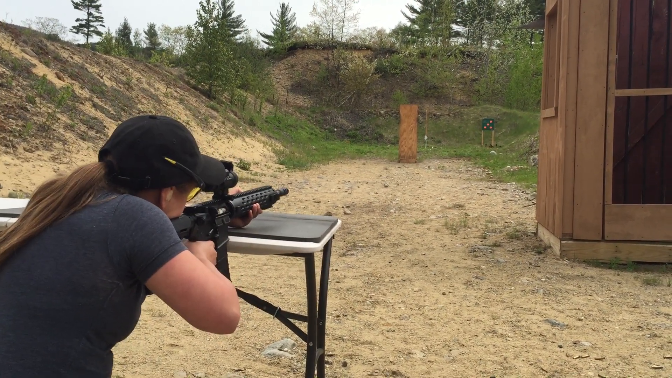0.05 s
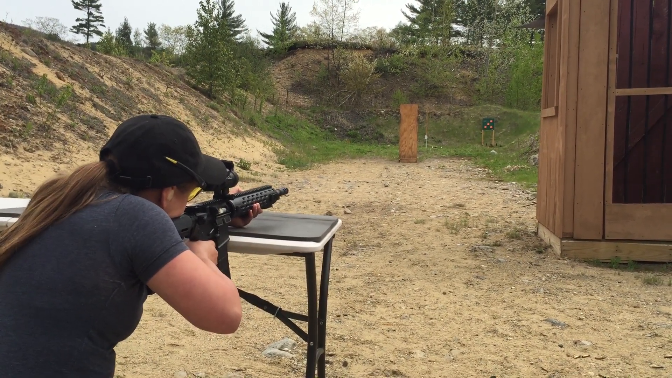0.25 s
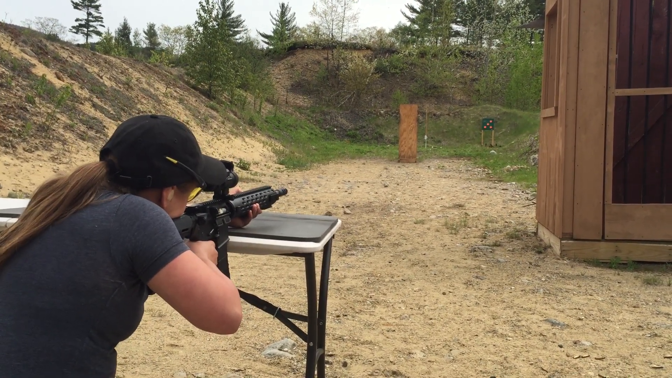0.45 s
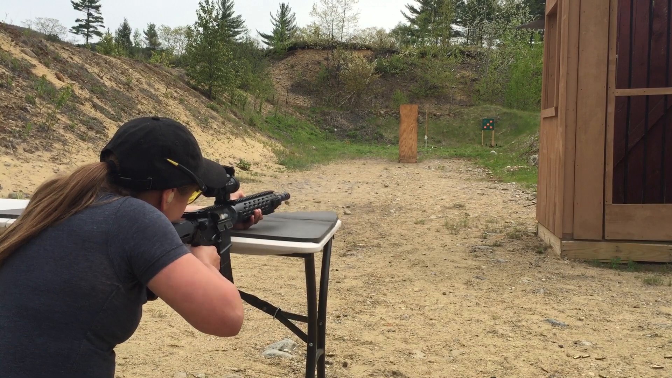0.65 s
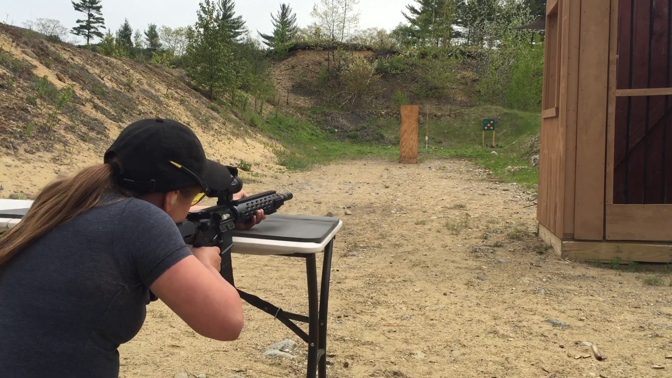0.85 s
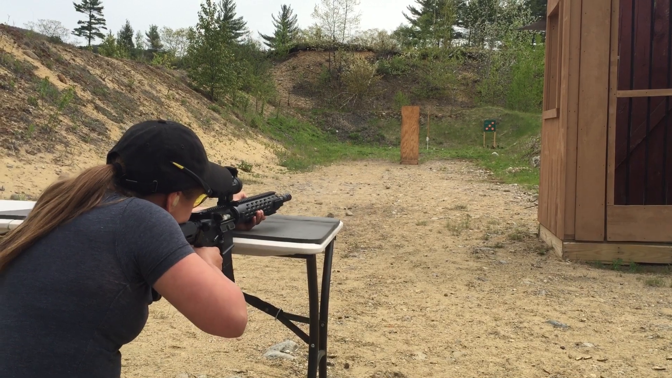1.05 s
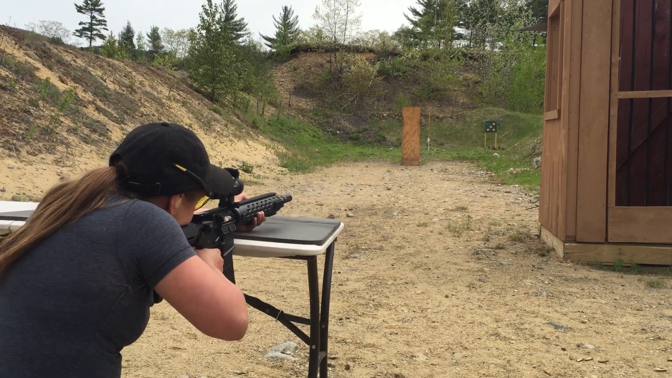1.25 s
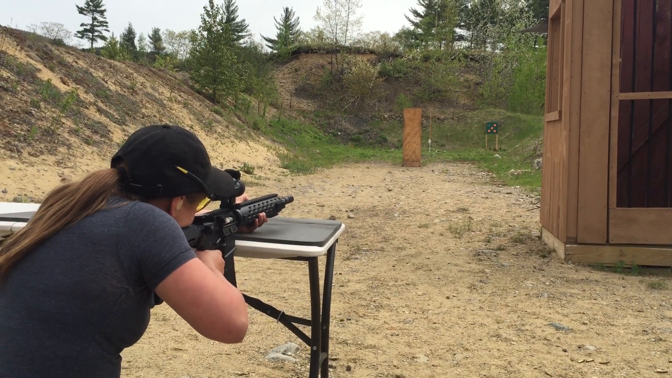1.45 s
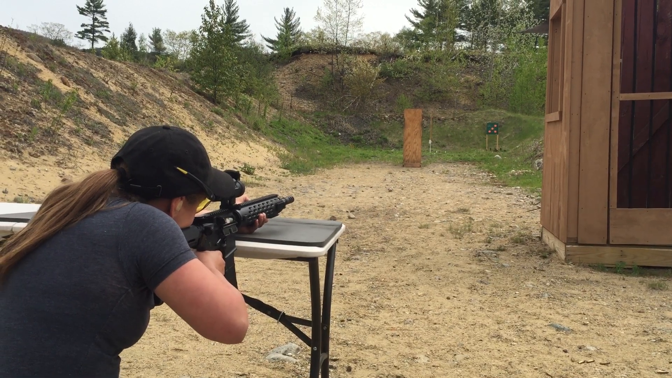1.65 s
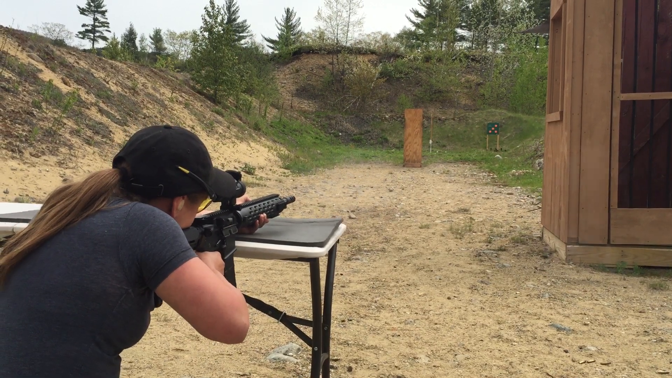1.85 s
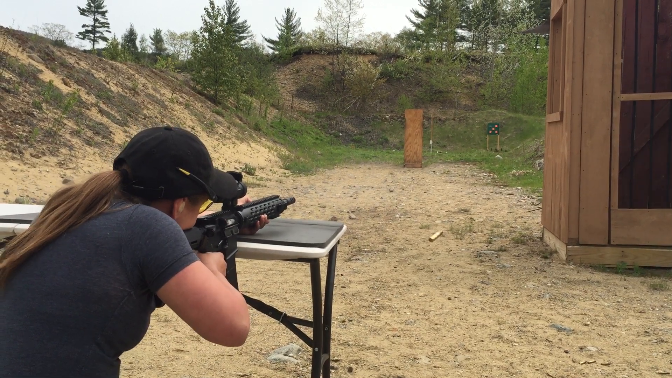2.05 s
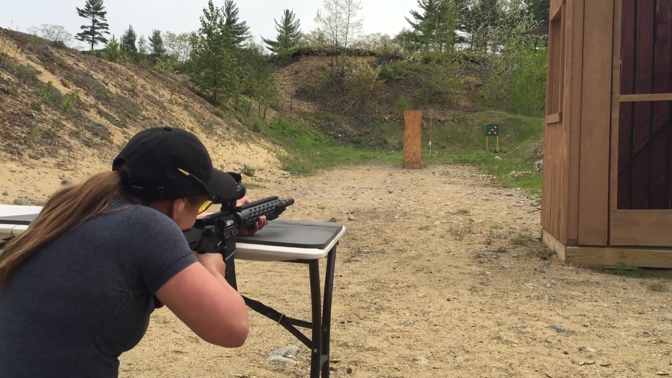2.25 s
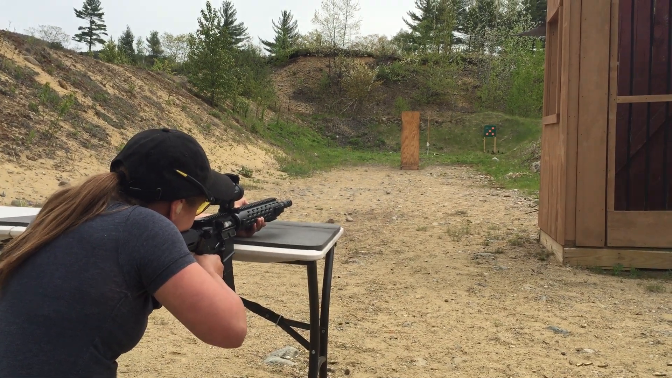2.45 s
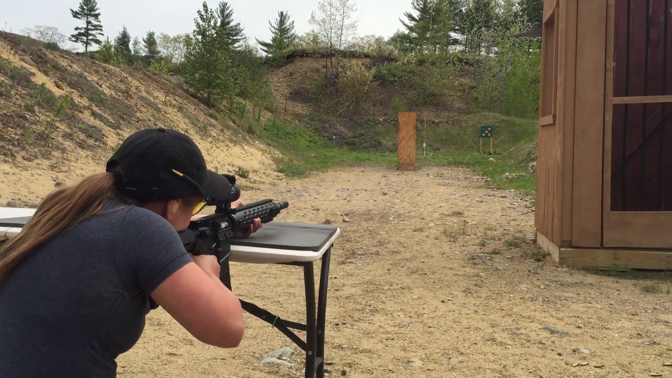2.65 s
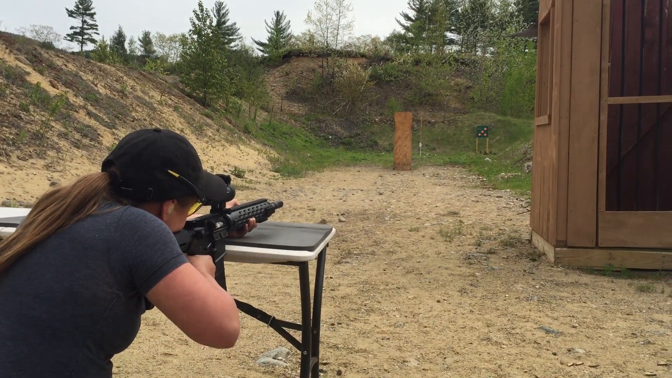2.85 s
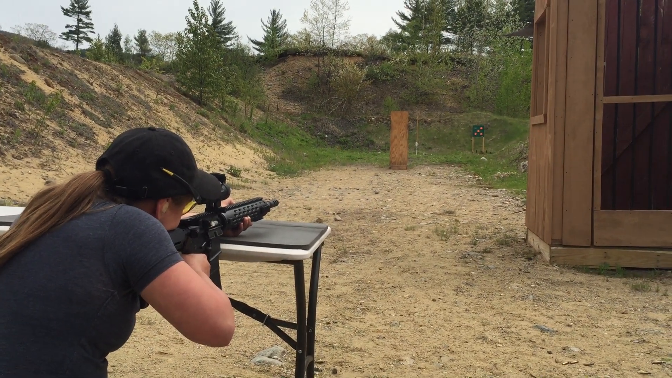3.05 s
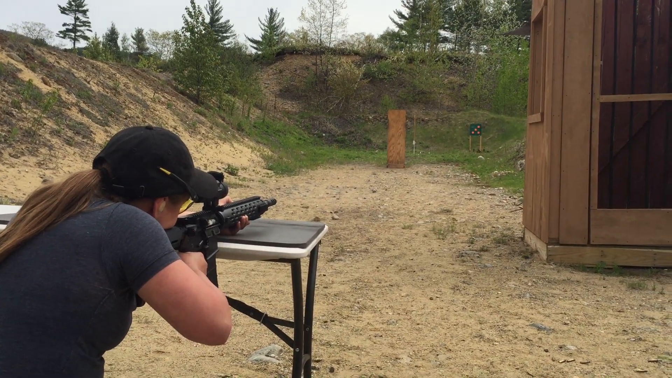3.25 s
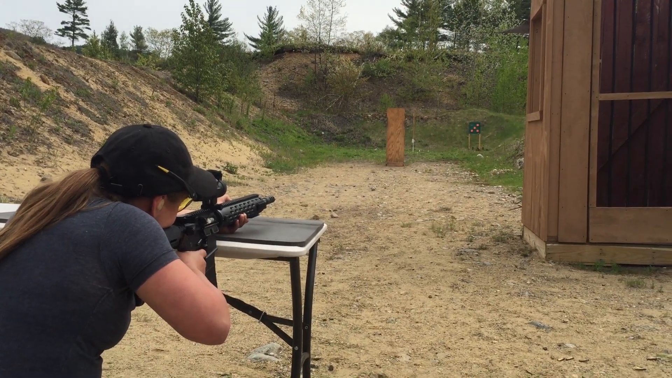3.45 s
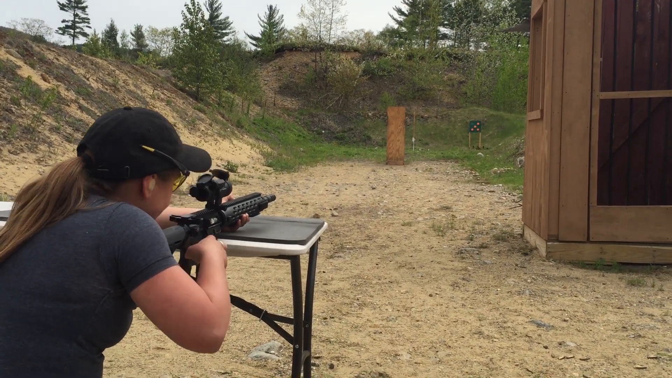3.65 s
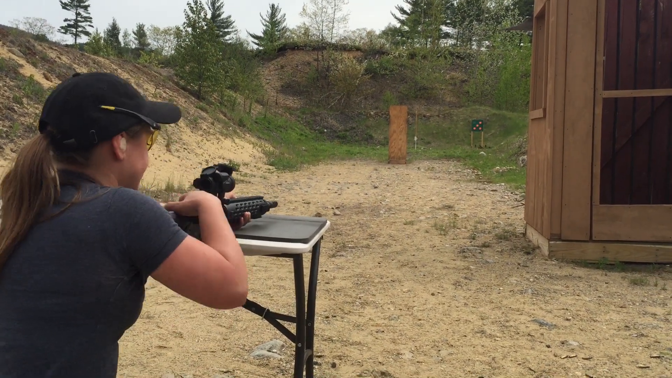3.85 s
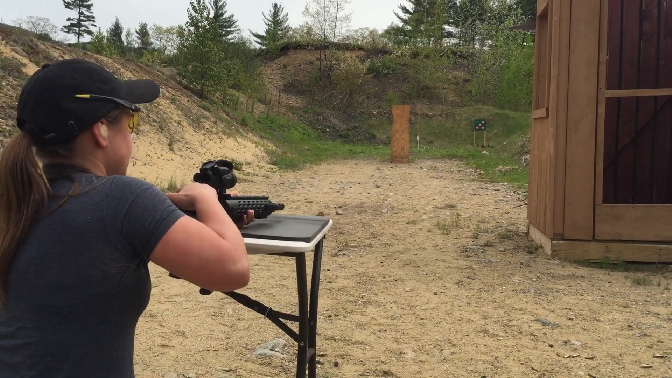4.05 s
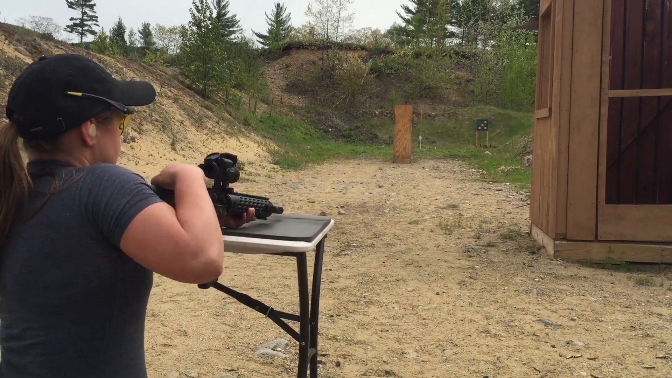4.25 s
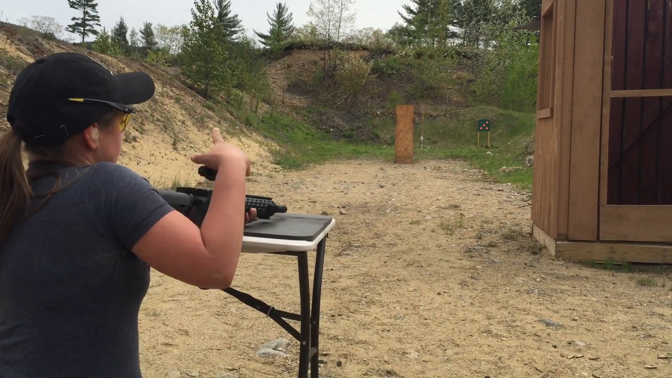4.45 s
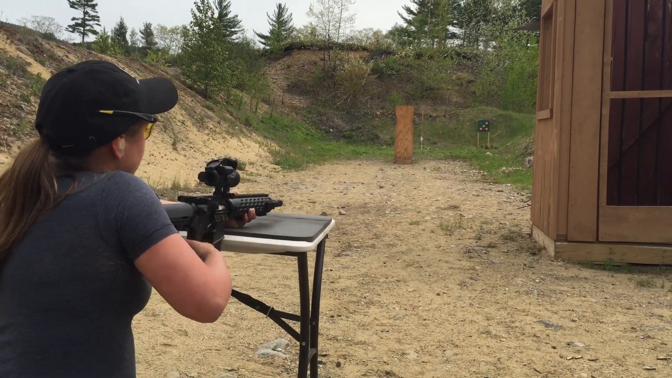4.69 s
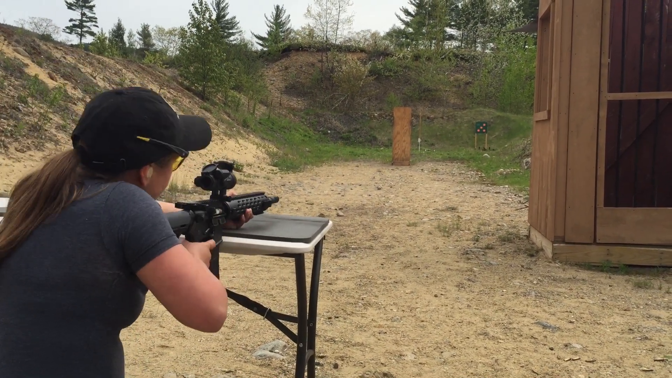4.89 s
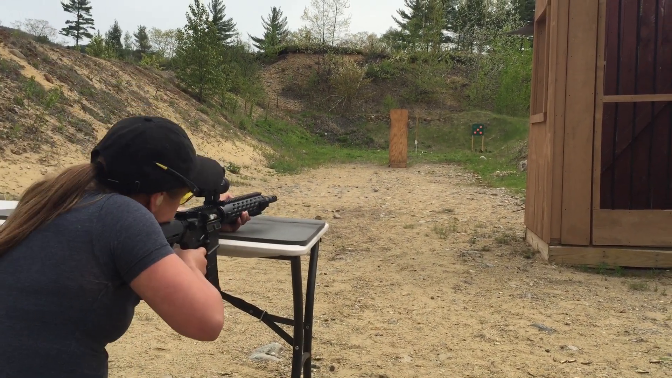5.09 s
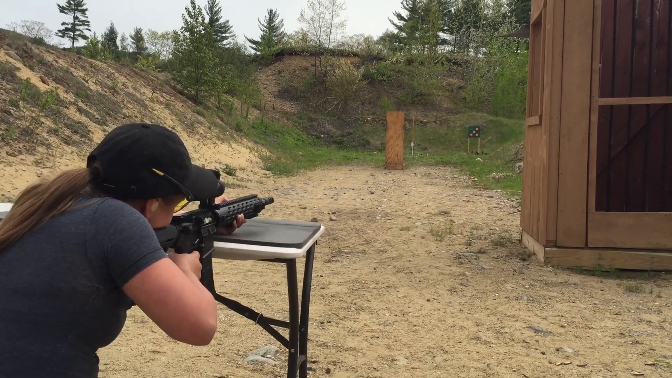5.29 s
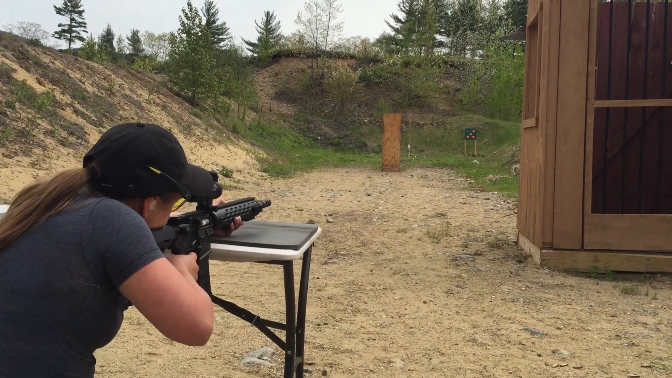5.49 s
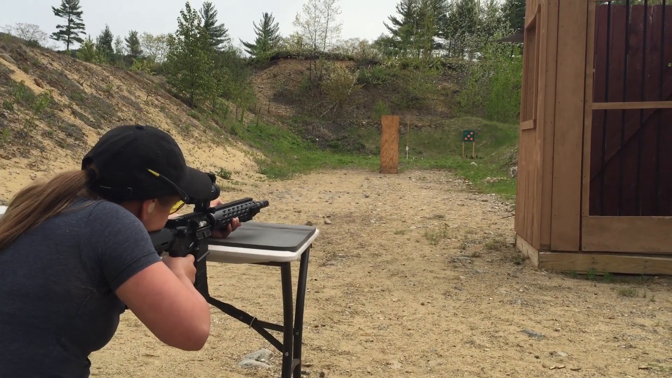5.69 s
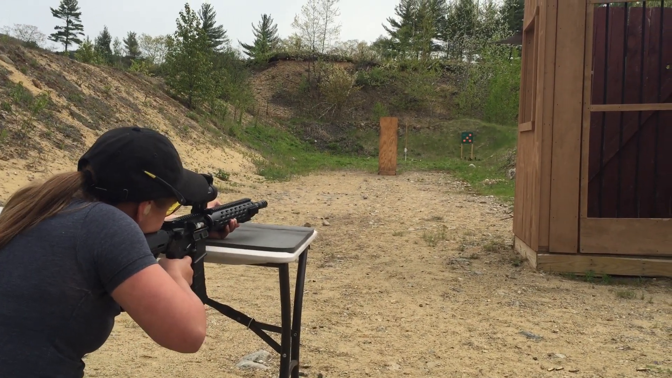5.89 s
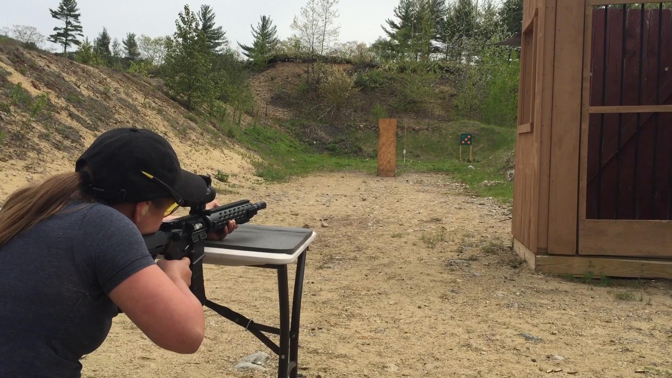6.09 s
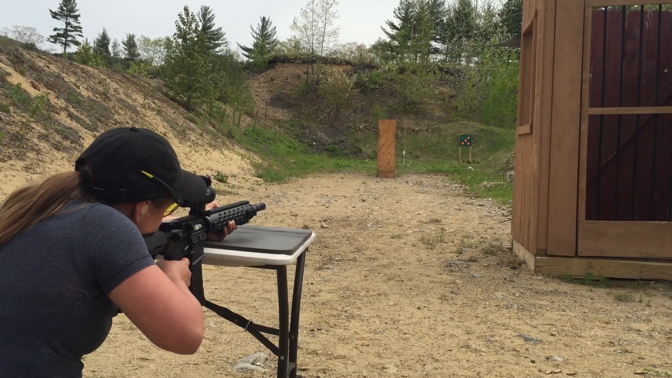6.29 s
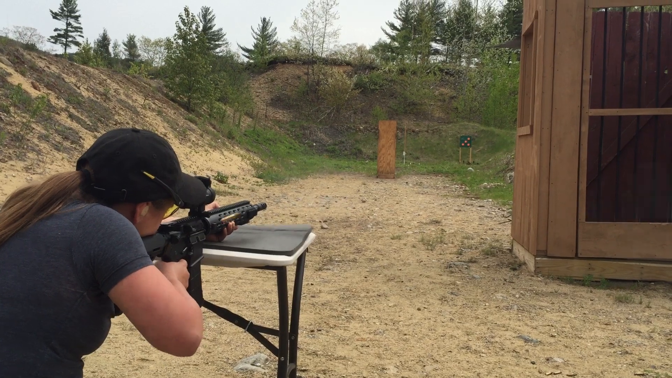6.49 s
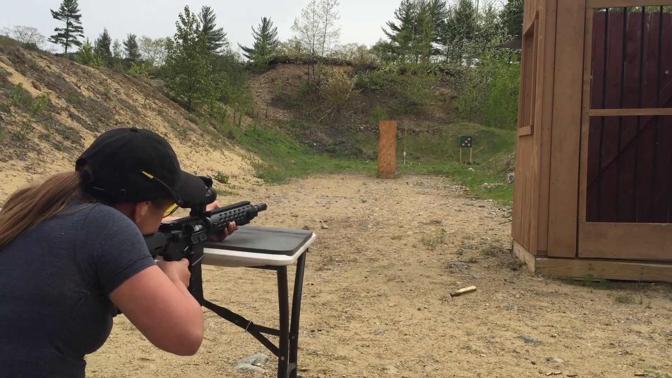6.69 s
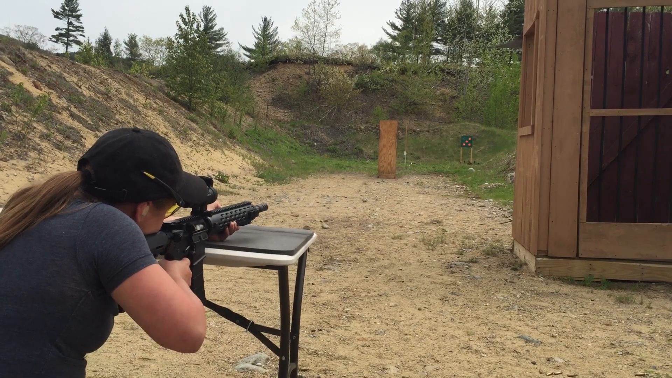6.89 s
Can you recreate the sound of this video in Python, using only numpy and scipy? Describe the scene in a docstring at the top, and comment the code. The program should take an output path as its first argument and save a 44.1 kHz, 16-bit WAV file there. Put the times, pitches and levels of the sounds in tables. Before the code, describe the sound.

A fading gun echo and faint bird whistles open an outdoor range. A close rifle fires twice, distorting the microphone, its bolt clattering and brass ticking on gravel. A sharp gun farther off cracks, then a dry hammer click, hands rubbing and the bolt racked hard. Muffled and sharp distant shots alternate before one last loud close blast.

```python
"""An outdoor range over steady air noise and a faint bird. A sharp gun's echo dies away, then a near rifle
fires twice, its bolt clattering and its cases landing. The sharp gun answers, the rifle's hammer clicks on a dead
round, and hands shift and rack the bolt. A gun muffled by an earth bank, the sharp one and the muffled one fire
before the rifle's last shot. Reports are decaying noise bands and low swings of pressure, echoes are scattered
noise, metal is grit through resonances; the close blasts overload the microphone and pull its gain down."""
import sys
import numpy as np
from scipy import signal
from scipy.fft import rfft, irfft, next_fast_len
from scipy.io import wavfile
from scipy.ndimage import uniform_filter1d

SR = 44100
rng = np.random.default_rng(int(sys.argv[2]) if len(sys.argv) > 2 else 0)


def put_to_file(sound):
    """Save the sound as 16-bit audio at rate SR, in the file named by the first command-line argument."""
    columns = np.atleast_2d(sound).T  # one column per channel
    safe = np.clip(columns, -1, 1)
    whole_steps = np.round(safe * 32767)
    wavfile.write(sys.argv[1], SR, whole_steps.astype(np.int16))


N = 305613
TIME = np.arange(N) / SR
BRIEF = TIME[:SR // 2]  # half a second, the length of each short sound such as a report, contact or bird call

# the near rifle's shots: (time [s], blast level [dB], level of the low push just ahead [dB], echo level [dB],
# bolt's travel to the rear [s], action level [dB]), levels relative
RIFLE_SHOTS = [(0.725, 0, 7.5, 3, 0.086, -9), (1.9911, 5.5, -11.5, 8.5, 0.082, -0.5),
               (6.5984, 3.5, -5, 7, .088, -0.5)]
# resonances of the receiver: (centre [Hz], width [Hz], relative level [dB])
RECEIVER_MODES = [(1090, 330, -3), (1670, 298, 3), (3150, 300, -0.5), (3365, 130, 2), (3700, 480, -3)]
# high resonances of small steel parts: (centre [Hz], width [Hz], relative level [dB])
STEEL_MODES = [(4750, 1800, -8), (6094, 390, 8), (9500, 1000, -16), (13200, 4600, -21)]


def amp(db):
    """Decibels to a factor of amplitude."""
    return 10 ** (np.asarray(db) / 20)


def unit(x):
    """x scaled to rms 1."""
    return x / np.sqrt(np.mean(x ** 2) + 1e-20)


def along(points, hz):
    """Interpolate (frequency [Hz], value) points on a log axis."""
    f, values = np.transpose(points)
    return np.interp(np.log(hz + 1), np.log(f + 1), values)


def filtered(x, response):
    """x times a complex response of frequency."""
    size = next_fast_len(len(x) + 8192)
    spectrum = rfft(x, size) * response(np.fft.rfftfreq(size, 1 / SR))
    return irfft(spectrum, size)[:len(x)]


def noise(response, size):
    """Coloured noise of rms 1."""
    return unit(filtered(rng.standard_normal(size), response))


def grit(size, spiky_db):
    """Noise of rms 1 made of tiny uneven impacts."""
    knots = rng.standard_normal(size // 40 + 2)  # a new strength about every 40 samples
    places = np.linspace(0, len(knots) - 1, size)
    strength = amp(spiky_db * np.interp(places, np.arange(len(knots)), knots))
    return unit(strength * rng.standard_normal(size))


def fade(t60):
    """A decay of 60 dB in t60 seconds, never quicker than 2 ms."""
    return np.exp(-np.log(1000) * BRIEF / max(t60, .002))


def swell(rise):
    """A soft start that takes about rise seconds."""
    return 1 - np.exp(-(BRIEF / max(rise, 1e-5)) ** 2)


def add(track, s, sound):
    """Mix a sound in at time s; before zero, only its remainder is heard."""
    start = round(s * SR)
    part = sound[max(-start, 0):max(N - start, 0)]
    track[max(start, 0):][:len(part)] += part


def band_pass(f, centre, width):
    """Complex response of one resonance, 1 at its centre."""
    return 1j * f * width / (centre * centre - f * f + 1j * f * width)


def resonate(x, modes):
    """x through a body's resonances of alternating sign, keeping the power of white noise."""
    def response(f):
        body = sum((-1) ** k * amp(db) * band_pass(f, centre, width)
                   for k, (centre, width, db) in enumerate(modes))
        return body / np.sqrt(np.mean(abs(body) ** 2))
    return filtered(x, response)


def lifted(x, peaks):
    """x with a few ringing resonances added."""
    return filtered(x, lambda f: 1 + sum((amp(db) - 1) * band_pass(f, centre, width)
                                         for centre, width, db in peaks))


def burst(bands):
    """Sudden noise whose overlapping bands each die at their own speed."""
    centres = [hz for hz, _, _ in bands]
    edges = np.log([centres[0] / 2] + centres + [centres[-1] * 2])
    out = np.zeros(len(BRIEF))
    for k, (_, db, t60) in enumerate(bands):
        band = noise(lambda f: np.interp(np.log(f + 1), edges[k:k + 3], [0, 1, 0]), len(BRIEF))
        out += amp(db) * fade(t60) * band
    return out


def boom(modes):
    """Damped low swings of pressure that build within about a cycle, a little different every time."""
    out = np.zeros(len(BRIEF))
    for hz, db, t60 in modes:
        swing = np.sin(2 * np.pi * hz * rng.normal(1, 0.025) * BRIEF)
        out += amp(db) * swell(.8 / hz) * fade(t60) * swing
    return out


def report(bands, modes, slaps, peaks, rise, smear):
    """One muzzle report with its hard reflections, smeared by rough surfaces."""
    # noise of a hard reflection: (band centre [Hz], relative level [dB], t60 [s])
    slap_bands = [(400, -6, 0.05), (1450, -2.5, 0.086), (3300, 0, 0.029), (5660, -25, 0.095),
                  (12900, -33, 0.022)]
    crack = swell(rise) * burst(bands)
    for delay, db in slaps:
        reflection = np.pad(swell(smear) * burst(slap_bands), (round(delay * SR), 0))
        crack += amp(db - 9.5) * reflection[:len(crack)]
    return lifted(crack, peaks) + boom(modes)


def answer(reflectors, delay):
    """Each reflector's echo swells to a peak and falls steadily; their powers add up."""
    power = 0
    for peak, db, rise, fall in reflectors:
        early = np.maximum(peak - delay, 0) / rise
        late = np.maximum(delay - peak, 0)
        power = power + amp(db - 10 * early ** 2 - fall * late) ** 2
    return np.sqrt(power)


def scatter(reflectors, treble_db, lumpy_db, lumps_hz):
    """Countless small reflections arriving in clumps; treble dulls as the paths lengthen."""
    # colour and its drift: (frequency [Hz], relative spectral density [dB], change of level [dB per s])
    scatter_colour = np.array([(25, -28, -10), (48, -11, -15.5), (79, 2, -18), (213, -7, -4.5),
                               (420, -5, -2.5), (680, -3, 3), (1110, -1, 1), (1650, 2.5, -1.5),
                               (2420, -4, -4.5), (3423, 4.5, -8), (5000, -16.5, -21.5),
                               (6270, -12.5, -37.5), (8337, -26.5, -59.5), (14900, -42, -74.5)])
    hz, t, z = signal.stft(grit(2 * SR, spiky_db=2.0), SR, nperseg=1024)
    treble = along([(4000, 0.00022), (11000, treble_db)], hz)
    colour = unit(amp(along(scatter_colour[:, :2], hz) + treble))
    dulling = amp(along(scatter_colour[:, ::2], hz)[:, None] * t)
    # each stretch of bank returns its own colour
    patches = uniform_filter1d(rng.standard_normal(z.shape), size=7, axis=0)
    patches = unit(uniform_filter1d(patches, size=4, axis=1))
    coloured = z * colour[:, None] * dulling * amp(2.7 * patches)
    tail = signal.istft(coloured, SR, nperseg=1024)[1][:2 * SR]
    delay = TIME[:2 * SR]
    lumps = np.interp(delay * lumps_hz, np.arange(2048), rng.standard_normal(2048))
    return tail * answer(reflectors, delay) * amp(lumpy_db * lumps)


def nearby(x):
    """Close surfaces add weak copies, which ripple the spectrum."""
    # short paths off bench top, shooter and ground: (delay [s], level [dB])
    short_paths = [(.0019, -28), (.0037, -25), (.0062, -24), (0.0101, -18)]
    return filtered(x, lambda f: 1 + sum(amp(db) * np.exp(-2j * np.pi * f * delay)
                                         for delay, db in short_paths))


def air():
    """Steady coloured noise of the open range."""
    # (frequency [Hz], relative spectral density [dB])
    air_colour = [(20, -25), (45, -10), (80, 2.5), (250, -3), (450, -4), (700, -0.5), (1600, -3),
                  (2400, -5), (3400, -4.5), (5000, -21), (9000, -27.5), (16000, -34.5)]
    return amp(-60.0) * noise(lambda f: amp(along(air_colour, f)), N)


def bird(note_hz, fall_hz, gap):
    """Three quick, slightly falling whistles a call, one every gap seconds."""
    # calls: (time [s], relative level [dB])
    calls = [(.425, -73), (.665, -76), (1.919, -67.5), (2.665, -73), (2.925, -74.5), (5.49, -71),
             (6.22, -73)]
    out = np.zeros(N)
    through = BRIEF / gap % 1  # place within the note, 0 to 1
    notes = np.sin(np.pi * through) ** 2 * (BRIEF < 3 * gap)
    for s, db in calls:
        pitch = note_hz * rng.normal(1, .004) - fall_hz * through
        add(out, s, amp(db + 1.5) * notes * np.sin(2 * np.pi * np.cumsum(pitch) / SR))
    return out


def other_bay(shots, bands, modes, slaps, peaks, echo, treble_db, rumble_db):
    """A gun farther along the firing line, with its own paths to the banks."""
    # low rumble that rolls on in the bays: (band centre [Hz], relative level [dB], t60 [s])
    bay_rumble = [(87, -29, 0.68), (200, -38.5, 0.53), (320, -32.5, 0.6), (596, -39, 0.39)]
    out, echoes = np.zeros((2, N))
    for s, db, echo_db in shots:
        add(out, s, amp(db) * report(bands, modes, slaps, peaks, rise=0.0015, smear=0.0017))
        add(out, s, amp(db + rumble_db) * swell(0.032) * burst(bay_rumble))
        add(echoes, s, amp(echo_db) * scatter(echo, treble_db, lumpy_db=1.5, lumps_hz=142.0))
    return out + nearby(echoes)


def muffled_gun():
    """An earth bank dulls this gun, leaving mostly its low thump."""
    # (time [s], relative report level [dB], relative echo level [dB])
    muffled_shots = [(4.611, 3, 3.5), (5.661, 2.5, 3)]
    # noise of the report: (band centre [Hz], relative level [dB], t60 [s])
    muffled_bands = [(150, -24, 0.24), (454, -16.5, 0.093), (1030, -22, 0.053), (2900, -38, 0.11),
                     (5960, -66, .08)]
    # swings of pressure: (nominal frequency [Hz], relative level [dB], t60 [s])
    muffled_boom = [(55, -14, 0.082), (107, 1, 0.045), (357, -10, 0.012), (420, -3.5, 0.035),
                    (600, -11, 0.051)]
    # hard reflections: (delay [s], relative level [dB])
    muffled_slaps = [(0.065, -14.5), (.193, -16)]
    # slopes and woods: (delay of the peak [s], relative level [dB], rise [s], fall [dB per s])
    muffled_echo = [(0.101, -36.5, 0.066, 21.5), (0.197, -28, 0.043, 51), (.72, -38.5, .07, 45),
                    (1.099, -49, .3, 8)]
    gun = other_bay(muffled_shots, muffled_bands, muffled_boom, muffled_slaps, [], muffled_echo,
                    treble_db=-6.5, rumble_db=-1.0)
    # the bank also shades the highest treble
    return filtered(gun, lambda f: 1 / np.sqrt(1 + (f / 9000) ** 4))


def sharp_gun():
    """A cracking report with ringing resonances; the first shot falls before the scene starts."""
    # (time [s], relative report level [dB], relative echo level [dB])
    sharp_shots = [(-.215, 0, 3), (3.1645, 1, 3), (4.971, -0.5, 1)]
    # noise of the report: (band centre [Hz], relative level [dB], t60 [s])
    sharp_bands = [(143, -7, 0.11), (374, -12.5, 0.14), (1590, -6.5, 0.058), (3130, -12, 0.063),
                   (5400, -20, 0.064), (12000, -20.5, 0.03)]
    # swings of pressure: (nominal frequency [Hz], relative level [dB], t60 [s])
    sharp_boom = [(80, -6.5, 0.11), (112, -7, .06), (375.3, -9, 0.04)]
    # hard reflections: (delay [s], relative level [dB])
    sharp_slaps = [(0.0345, -7.5), (0.0439, -2), (.136, -14.5)]
    # resonances that colour the crack: (centre [Hz], width [Hz], lift [dB])
    sharp_peaks = [(156, 110, 0.53), (420.3, 26, 9.5), (1750, 530, 7.1), (3183, 230, 15.1),
                   (3880, 360, 11.7)]
    # slopes and woods: (delay of the peak [s], relative level [dB], rise [s], fall [dB per s])
    sharp_echo = [(.088, -23.5, .055, 57.4), (.82, -45, .06, 55), (1.1, -59, 0.18, 14)]
    return other_bay(sharp_shots, sharp_bands, sharp_boom, sharp_slaps, sharp_peaks, sharp_echo,
                     treble_db=5, rumble_db=0.5)


def cases():
    """Spent cases bounce on the gravel: a tick on a stone and a thin ring of brass."""
    # bounces: (time [s], relative level [dB])
    bounces = [(1.268, -62), (2.55, -69), (2.711, -53), (2.834, -59.5)]
    # ringing brass: (frequency [Hz], relative level [dB], t60 [s])
    brass_modes = [(10800, -8, .25), (15300, -8, 0.22)]
    out = np.zeros(N)
    ring = sum(amp(level - 8) * fade(t60) * np.sin(2 * np.pi * hz * BRIEF)
               for hz, level, t60 in brass_modes)
    for s, db in bounces:
        tick = fade(.025) * resonate(rng.standard_normal(len(BRIEF)), STEEL_MODES[:1])
        add(out, s, amp(db) * (ring + tick))
    return out


def handling():
    """Sleeves and hands rub the receiver and nudge the rifle on the bench; each move swells and fades."""
    # moves: (middle [s], half length [s], relative rub level [dB], relative bump level [dB])
    moves = [(3.815, 0.014, -45, -72), (3.966, 0.038, -48, -50.5), (3.989, .008, -43, -60),
             (4.096, .01, -58, -46), (4.136, .012, -44.5, -52.5), (4.17, 0.18, -46.5, -60.5),
             (4.395, .03, -53, -55)]
    pressure, nudge = np.zeros((2, N))
    for s, half, rub_db, bump_db in moves:
        move = np.exp(-((TIME - s) / half) ** 2)
        pressure += amp(rub_db) * move
        nudge += amp(bump_db) * move
    # the hand sticks and slips
    slips = amp(3.05 * noise(lambda f: np.exp(-f / 50), N))
    rub = resonate(pressure * slips * grit(N, spiky_db=2.0), RECEIVER_MODES)
    bumps = resonate(nudge * grit(N, spiky_db=3.5), [(81, 74, 2), (195, 79, 2.3)])
    soft_rub = filtered(rub, lambda f: 1 / (1 + 1j * f / 3000))
    return soft_rub + filtered(bumps, lambda f: 1 / (1 + 1j * f / 400))


def contacts():
    """Every metal contact: those made by hand, and the same three after each shot."""
    # hammer, charging handle and bolt clear the dead round:
    # (time [s], relative level [dB], t60 [s], high ring level [dB], stock knock level [dB])
    by_hand = [(3.3378, -16, 0.027, 5, -21), (3.35, -26, 0.041, 5, -17), (4.2435, -31.5, 0.075, -15.5, -35),
               (4.2675, -25, 0.047, -29, -34), (4.323, -24, 0.055, -35, -22.5),
               (4.3325, -15, 0.031, -27, -24), (4.357, -20.5, 0.02, -34, -11),
               (4.461, -30, 0.049, -33, -23), (4.561, -21, 0.025, -18, -25), (4.59, -8, 0.027, 1.5, -12.5)]
    # the bolt hits the buffer, slams shut and rebounds:
    # (relative level [dB], t60 [s] before the floor in fade, high ring level [dB], stock knock level [dB])
    bolt_rear = (-23, 0.0519, 8.5, -5)
    bolt_shut = (-10, 0.02, -16, 0)
    bolt_rebound = (-27.5, -0.02, 4.5, 8)
    rows = list(by_hand)
    for s, _, _, _, rear_s, action_db in RIFLE_SHOTS:
        # delays after the shot [s]
        cycle = [(rear_s, bolt_rear), (.125, bolt_shut), (.1425, bolt_rebound)]
        for delay, (db, *ring) in cycle:
            rows.append((s + delay, action_db + db, *ring))
    return rows


def slide():
    """The released bolt strips a round: its scrape grows with its speed and rattles out once home."""
    start_s, travel_s, rattle_t60_s = 4.545, 0.036, 0.12
    out = np.zeros(N)
    speed = np.minimum(BRIEF / travel_s, 1)
    rattle = np.interp(BRIEF - travel_s, BRIEF, fade(rattle_t60_s))
    add(out, start_s, amp(-12) * speed * rattle * grit(len(BRIEF), spiky_db=4))
    return out


def action():
    """Hammer, charging handle and bolt chatter briefly against receiver, steel parts and stock."""
    # (centre [Hz], width [Hz], relative level [dB])
    stock_modes = [(282, 130, 4.5), (446, 490, -0.5)]
    receiver, steel, stock = np.zeros((3, N))
    for s, db, t60, ring_db, knock_db in contacts():
        # long, sliding contacts also start more softly
        chatter = amp(db + 5.0) * swell(t60 / 30) * fade(t60) * grit(len(BRIEF), spiky_db=-0.5)
        add(receiver, s, chatter)
        add(steel, s, amp(ring_db) * chatter)
        add(stock, s, amp(knock_db) * chatter)
    scrape = slide()
    metal = resonate(receiver + scrape, RECEIVER_MODES)
    metal = filtered(metal, lambda f: 1 / (1 + 1j * f / 5000))
    bright = resonate(steel + amp(-20) * scrape, STEEL_MODES)
    direct = metal + bright + resonate(stock, stock_modes)
    # bench and shed add a short, duller ring-out
    ring_out = fade(0.23) * rng.standard_normal(len(BRIEF))
    ring_out = ring_out / np.linalg.norm(ring_out)
    soft = metal + amp(-14) * (direct - metal)
    return direct + amp(-9.5) * signal.fftconvolve(soft, ring_out)[:N]


def lead_in():
    """A short gritty buzz that grows into the blast."""
    # (centre [Hz], width [Hz], relative level [dB])
    buzz_modes = [(430, 210, 1), (1980, 230, -6), (2990, 110, 3.5), (3300, 860, -10), (6000, 980, -22.5),
                  (12000, 4400, -34.5)]
    t = BRIEF[BRIEF < .0225]
    growth = amp(-20.5 + 120 * t)  # rises 120 dB per s
    level = np.pad(growth, (0, len(BRIEF) - len(t)))
    return resonate(level * rng.standard_normal(len(BRIEF)), buzz_modes)


def near_rifle():
    """A buzz and a low push run just ahead of each blast; the backstop answers a fifth of a second later."""
    # noise of the blast: (band centre [Hz], relative level [dB], t60 [s])
    blast_bands = [(139, -4.5, 0.2), (450, -0.5, .13), (1300, 3, 0.031), (3180, 0.5, 0.044),
                   (5670, -7.5, 0.053), (13000, -13, 0.063)]
    # swings of pressure in the blast and in the push: (nominal frequency [Hz], relative level [dB], t60 [s])
    blast_boom = [(39, 2, 0.15), (89.8, 6.5, 0.105), (273.3, -3.5, 0.14), (366.6, -5, 0.16),
                  (562.4, 3.5, 0.09)]
    push_modes = [(400, -2, .04), (580, -11, .03)]
    # reflections off the shed, benches and bank: (delay [s], relative level [dB])
    blast_slaps = [(0.0231, -1.5), (.034, -2)]
    # resonances that colour the crack: (centre [Hz], width [Hz], lift [dB])
    blast_peaks = [(548, 28, 3), (1300, 110, 4.5), (1870, 230, 7), (3210, 660, 11), (4000, 300, 4.5)]
    # slopes and woods: (delay of the peak [s], relative level [dB], rise [s], fall [dB per s])
    blast_echo = [(.05, -24, .1, 290), (.228, -38.5, 0.023, 110), (.275, -34.5, 0.042, 88.5),
                  (.53, -52.5, .15, 18.5), (.82, -55.5, 0.054, 60)]
    out, echoes = np.zeros((2, N))
    for s, db, push_db, echo_db, _, _ in RIFLE_SHOTS:
        add(out, s - .0225, lead_in())
        add(out, s - .005, amp(push_db) * boom(push_modes))
        blast = report(blast_bands, blast_boom, blast_slaps, blast_peaks, rise=0.00088, smear=0.00033)
        add(out, s, amp(db + 0.5) * blast)
        add(echoes, s, amp(echo_db) * scatter(blast_echo, treble_db=9, lumpy_db=1.5, lumps_hz=102))
    return out + nearby(echoes)


def scene():
    """Mix the range, the other guns and the near rifle into one channel."""
    outdoors = air() + bird(note_hz=5330, fall_hz=260, gap=0.024)
    other_guns = muffled_gun() + sharp_gun()
    rifle = cases() + handling() + action() + near_rifle()
    return (outdoors + other_guns + rifle)[None]


def lag(x, seconds):
    """One-pole smoothing."""
    keep = np.exp(-1 / (SR * seconds))
    return signal.lfilter([1 - keep], [1, -keep], x)


def gain_control(x, threshold_db, depth_db, attack, release):
    """A sustained overload pulls the gain down; it creeps back over a second or two."""
    level_db = 10 * np.log10(lag(np.minimum(x * x, .5), .05) + 1e-12)
    # the cut is complete 3 dB above the threshold
    cut_db = depth_db * np.clip((level_db - threshold_db) / 3, 0, 1)
    # the deepest cut so far decays until a stronger one replaces it
    recovery = np.exp(-TIME / release)
    held_db = recovery * np.maximum.accumulate(cut_db / recovery)
    return x * amp(-lag(held_db, attack))


def record(dry):
    """Bass roll-off, gain control, a hard overload ceiling and the band limit."""
    x = signal.sosfilt(signal.butter(2, 30, "high", fs=SR, output="sos"), dry[0])
    x = gain_control(x, threshold_db=-9.5, depth_db=15, attack=0.048, release=1.14)
    # limit at three times the rate to keep aliasing down
    ceiling = .69
    x = signal.resample_poly(x, 3, 1)
    x = x / (1 + np.abs(x / ceiling) ** 8) ** (1 / 8)
    x = signal.resample_poly(x, 1, 3)
    top_hz = 16100
    return filtered(x, lambda hz: 1 / np.sqrt(1 + (hz / top_hz) ** 160))[None]


dry = scene()
out = record(dry)
put_to_file(out)
```